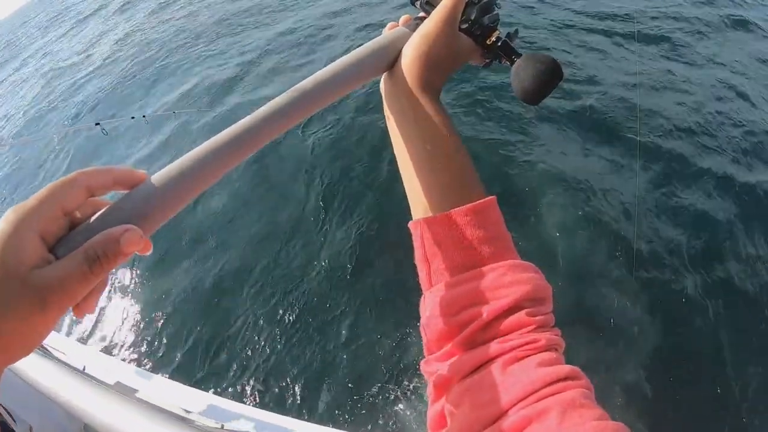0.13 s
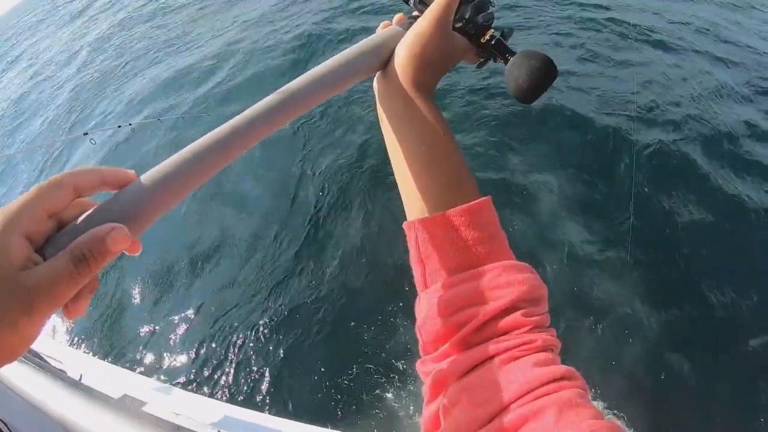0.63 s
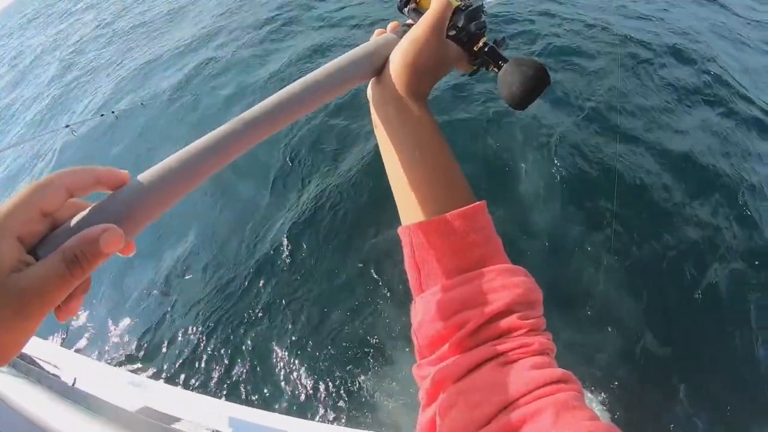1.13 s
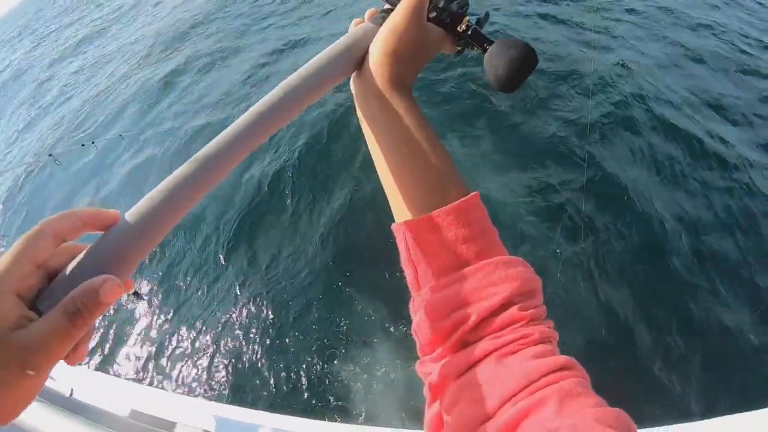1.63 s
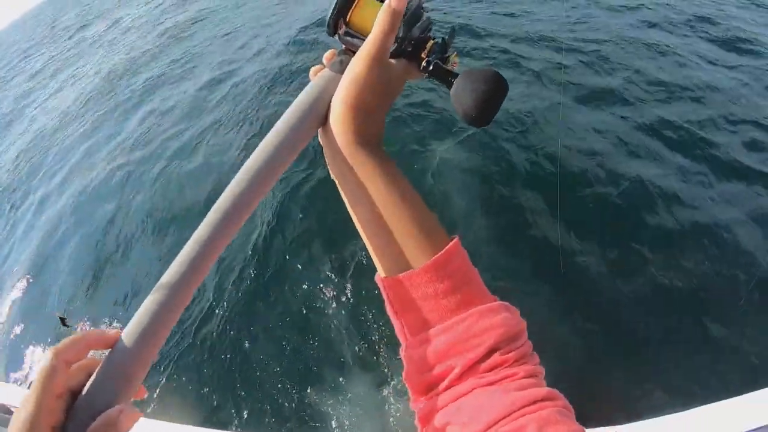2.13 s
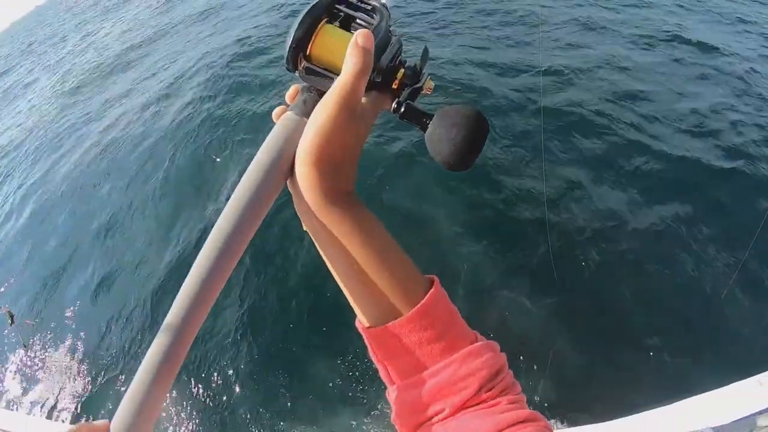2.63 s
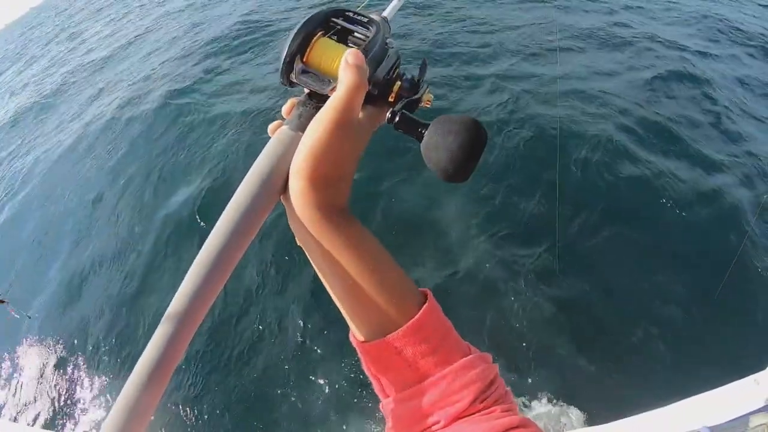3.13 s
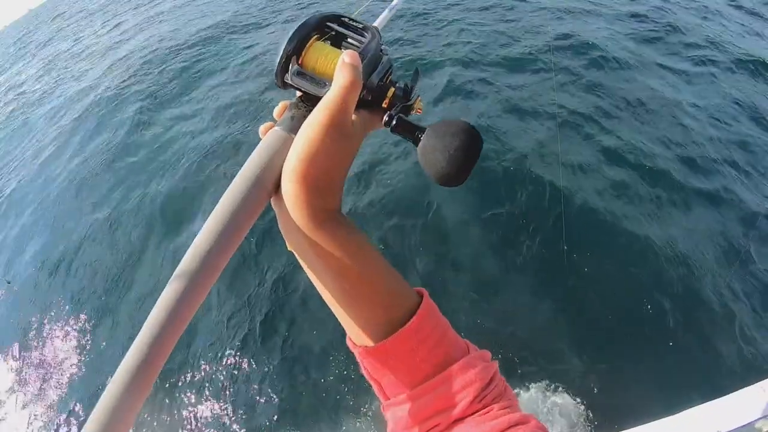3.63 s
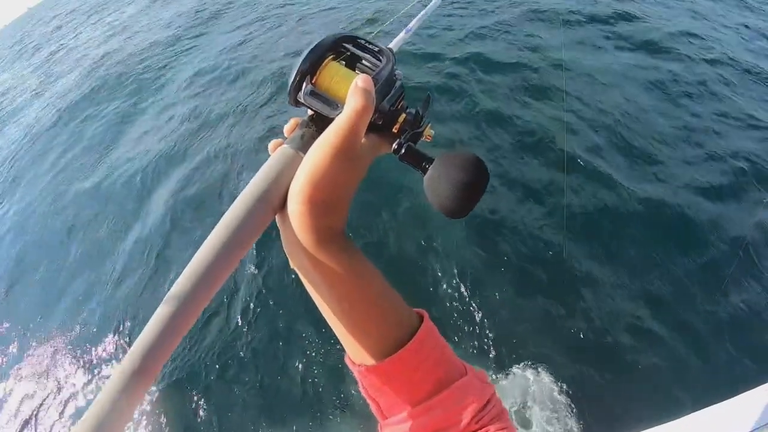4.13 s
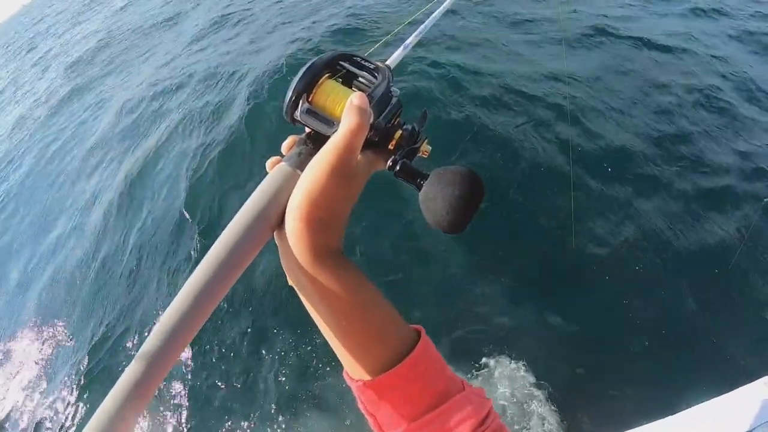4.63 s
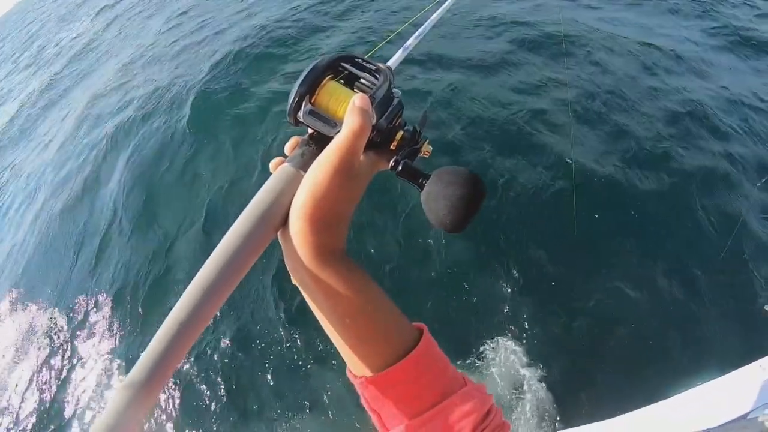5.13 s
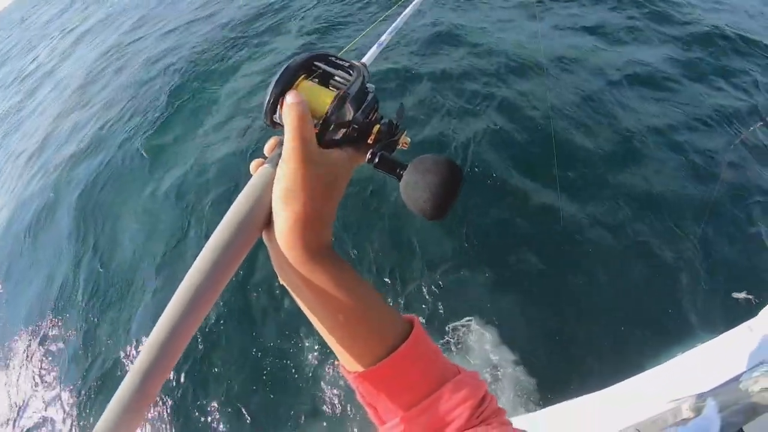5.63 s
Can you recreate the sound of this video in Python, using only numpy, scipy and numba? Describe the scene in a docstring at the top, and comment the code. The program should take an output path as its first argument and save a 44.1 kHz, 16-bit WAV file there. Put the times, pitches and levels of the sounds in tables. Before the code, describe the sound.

An idling fishing boat on open water, heard for just under six seconds by a small stereo camera near the rail. Throughout, a low diesel drone blends with a wavering generator hum and a steady pump hum around 170 Hz, beneath a dense, dull roar of exhaust and water with faint hiss. Soft low wind buffets appear near 0.3, 1.2, 2.8 and 3.6 seconds, and again around 4.8 to 5.3. Tiny dry ticks occur in the first 0.7 seconds and at 1.7, with a dull double tap near 0.5 and a faint rub at 1.65. At 3.1 a loud, bright, extremely short reel click snaps, with tiny aftersounds; the background above the bass dips and quickly recovers. A muffled tap follows at 4.6. Around 5.35 a rapid cluster of dull knocks and grainy thumb rubbing, slightly left, gives way to faint brushing as the stereo narrows.

```python
"""At the rail of an idling fishing boat, heard by a small camera with two microphone ports. Diesel, generator
and pump drone as wavering tones; exhaust and water are coloured noise. Gusts are short buffets of noise; soft,
grainy swells of noise are mostly a thumb brushing the spool. Reel clicks and dull taps are decaying tones; dry
ticks are tiny noise bursts. The camera's gain control ducks after the loud click, and the stereo image narrows
towards the end."""
import sys
import numpy as np
from scipy import signal
from scipy.fft import rfft, irfft, next_fast_len
from scipy.io import wavfile
from scipy.ndimage import map_coordinates
from numba import njit

SR = 44100
rng = np.random.default_rng(int(sys.argv[2]) if len(sys.argv) > 2 else 0)


def generate_wav(signal):
    """Clip the signal to [-1, 1] and save it as 16-bit WAV at the path in sys.argv[1]."""
    frames = np.transpose(np.atleast_2d(signal))
    scaled = np.clip(frames, -1, 1) * 32767
    pcm = np.round(scaled).astype(np.int16)
    wavfile.write(sys.argv[1], SR, pcm)


def natural_amplitude(level_db):
    """Convert a level in decibels to a linear amplitude factor, elementwise."""
    exponent = np.asarray(level_db, float) / 20
    return 10 ** exponent


N = 253999
T = np.arange(N) / SR  # time of each sample [s]
SIZE = next_fast_len(N)
HZ = np.maximum(np.fft.rfftfreq(SIZE, 1 / SR), 1)  # frequency of each spectrum line [Hz]


def level(x, db):
    """Scale a sound to an rms level in dB."""
    return x * natural_amplitude(db) / np.sqrt(np.mean(x ** 2))


def curve(table):
    """Join (time, value) rows by straight lines."""
    return np.interp(T, *np.transpose(table))


def shape(table):
    """Join (frequency, value) rows by straight lines on a log-frequency axis."""
    hz, value = np.transpose(table)
    return np.interp(np.log(HZ), np.log(hz), value)


def walk(rate):
    """A smooth random wander with `rate` new values a second and a spread near 1."""
    values = rng.standard_normal(int(T[-1] * rate) + 2)
    return map_coordinates(values, [T * rate], order=2)


def noise(gain):
    """Random noise coloured by a gain at each frequency."""
    return irfft(rfft(rng.standard_normal(SIZE)) * gain, SIZE)[:N]


def pan(x, db):
    """Make the left side louder than the right by db."""
    return x * natural_amplitude(np.array([[db], [-db]]) / 2)


def left_right(mid, side):
    """Turn a common part and a difference part into left and right."""
    return np.array([mid + side, mid - side])


def add(out, start_s, x):
    """Mix a short sound in at a time."""
    i = int(start_s * SR)
    out[:, i:i + x.shape[1]] += x[:, :N - i]


def ring(hz, t60, lag, rise):
    """A struck part rings: a tone that starts after a lag, swells in and falls 60 dB in t60 seconds."""
    t = np.maximum(T[:SR // 4] - lag, 0)
    decay = np.exp(-np.log(1000) * t / t60)
    swell = np.sin(np.pi / 2 * np.minimum(t / rise, 1)) ** 2
    return np.sin(2 * np.pi * hz * t) * decay * swell


def machine(turn_hz, orders, drift, waver_db, waver_rate):
    """A turning machine hums at multiples of its drifting rate; each tone wavers alone, higher ones more."""
    angle = 2 * np.pi * np.cumsum(turn_hz * (1 + drift * walk(2.036))) / SR
    start = rng.uniform(0, 2 * np.pi, len(orders))
    lowest = orders[0][0]
    tones = 0
    for (multiple, db), phase in zip(orders, start):
        waver = waver_db * (multiple / lowest) ** 0.35 * walk(waver_rate)
        tones = tones + np.sqrt(2) * natural_amplitude(db + waver) * np.sin(multiple * angle + phase)
    return tones, angle


# Fine hiss of water, level of the part common to both ports: (time [s], level [dB])
SPRAY_LEVEL = [(0.0, -54), (1.28, -55), (1.67, -53.5), (1.89, -56), (3.3, -58), (4.3, -56), (5.02, -61),
               (5.76, -56)]


def spray():
    """Water hisses: noise lifted near the port resonance, mostly differing between the two sides."""
    resonance = 1 / (1 + ((HZ - 8200) / 900) ** 4)
    gain = resonance + 1.6 / (1 + (7000 / HZ) ** 8)
    mid, side = level(noise(gain), 0), level(noise(gain), 4)
    return natural_amplitude(curve(SPRAY_LEVEL) + 2.0 * walk(17)) * left_right(mid, side)


# Colour of the wind noise: (frequency [Hz], relative level per Hz [dB])
WIND_COLOUR = [(15, -21.5), (25, -5.5), (65, 0), (120, -5.5), (200, -9.5), (400, -15.5), (700, -38),
               (1200, -45), (3000, -69)]
# Gusts on the ports: (time of full strength [s], hold [s], strength [dB])
GUST_TIMES = [(0.0, 0.2, -41), (0.261, .3, -25.5), (1.164, 0.027, -28.5), (2.422, 0.22, -37.5),
              (2.847, 0.091, -23.5), (3.012, .52, -33.5), (3.627, 0.19, -31), (4.792, 0.045, -23),
              (4.95, .05, -28.5), (5.09, 0.2, -24.5), (5.327, 0.26, -33.5)]
BREEZE_DB, GUST_RISE_S, GUST_FALL_S = -40.5, 0.0062, 0.018


def wind():
    """Breeze and gusts rumble at the ports in short buffets, stronger in the difference of the two."""
    strength = natural_amplitude(BREEZE_DB + 2.8 * walk(2.9))
    for full_s, hold_s, db in GUST_TIMES:
        rise = np.clip((T - full_s) / GUST_RISE_S + 1, 0, 1)
        fall = np.exp(-np.maximum(T - full_s - hold_s, 0) / GUST_FALL_S)
        strength = strength + natural_amplitude(db) * rise * fall
    colour = natural_amplitude(shape(WIND_COLOUR))
    common = colour / np.sqrt(1 + (45 / HZ) ** 6)  # less deep bass in the common part
    mid = level(noise(common) * natural_amplitude(0.51 * walk(42)), -6)
    side = level(noise(colour) * natural_amplitude(0.51 * walk(42)), -1)
    return strength * natural_amplitude(2.4 * walk(22)) * left_right(mid, side)


# Faint dry ticks of the tackle; the first decay time of each sounds 6 dB below its strength:
# (time [s], strength [dB], decay [s], centre [Hz], left minus right [dB])
TACKLE_TICKS = [(0.026, -37, .003, 8300, 3), (0.295, -40, .002, 8000, 1), (0.345, -32, 0.0026, 9600, -11),
                (0.3492, -32.5, 0.0023, 9600, -11), (0.625, -28, .001, 12000, -2),
                (1.6835, -39, .002, 9000, 7), (1.704, -33.5, .002, 8950, -7), (5.349, -31, .002, 6000, -3)]


def ticks():
    """Each tick is a burst of wide-band noise that dies away within milliseconds."""
    out, t = np.zeros((2, N)), T[:SR // 50]
    for start_s, db, decay_s, hz, pan_db in TACKLE_TICKS:
        burst = rng.standard_normal((3, len(t))) * np.exp(-t / decay_s)
        both = burst[0] + 0.6 * burst[1:]  # one shared noise plus one for each side
        edges = [hz / 1.6, min(hz * 1.6, 19000)]
        x = signal.sosfilt(signal.butter(2, edges, "bandpass", fs=SR, output="sos"), both)
        early_rms = np.sqrt(np.mean(x[:, :int(decay_s * SR) + 1] ** 2))
        add(out, start_s, pan(x * natural_amplitude(db) / early_rms / 2, pan_db))
    return out


# Soft grainy swells of noise, mostly thumb and sleeve rubbing; one leads into the loud click. Level before the
# swell: # (middle time [s], length [s], level [dB], centre [Hz], left minus right [dB])
GRAINY_SWELLS = [(1.652, 0.1, -53.5, 11400, -5), (3.092, 0.034, -46.5, 12000, -2),
                 (5.345, 0.013, -44, 4500, -8), (5.351, 0.037, -36.5, 1500, -7), (5.35, 0.029, -37, 1930, -6),
                 (5.352, 0.02, -41, 7000, -17), (5.377, 0.02, -43.5, 3200, 0), (5.414, 0.17, -53.5, 4470, 0),
                 (5.461, 0.04, -47.5, 9450, -6), (5.7, 0.38, -51, 12000, -2)]


def grainy_swells():
    """Grainy noise in soft swells, mostly skin on a surface, partly shared by the two sides."""
    out = 0
    for middle_s, length_s, db, hz, pan_db in GRAINY_SWELLS:
        gain = 1 / (1 + (np.log2(HZ / hz) / 1.3) ** 4)
        both = np.array([noise(gain), noise(gain)]) + 0.84 * noise(gain)
        grain = level(both, db) * natural_amplitude(3.0 * walk(155))
        swell = np.exp(-(2 * (T - middle_s) / length_s) ** 2)
        out = out + pan(grain * swell, pan_db)
    return out


# Dull taps: (time [s], frequency [Hz], level of the first tone [dB], 60 dB decay [s], left minus right [dB])
DULL_TAPS = [(0.476, 1200, -23, .12, 2.5), (0.497, 1150, -25, .08, 2.5), (4.58, 620, -25, .07, 0),
             (5.335, 1780, -23, .03, -6), (5.341, 2050, -21, .035, -6), (5.352, 1500, -26, .04, -5),
             (5.359, 1300, -24, .045, -5), (5.365, 1120, -26, .04, -4), (5.415, 1000, -27, .03, 0)]


def taps():
    """Each dull tap rings a close pair of tones, the upper one weaker and shorter."""
    out = np.zeros((2, N))
    for start_s, hz, db, t60, pan_db in DULL_TAPS:
        pair = ring(hz, t60, 0, 0.003) + 0.7 * ring(1.07 * hz, 0.46 * t60, 0, 0.002)
        add(out, start_s, pan(natural_amplitude(db) * pair, pan_db))
    return out


# Reel clicks: (time [s], peak before panning [dB], brightness [dB per octave], left minus right [dB])
REEL_CLICKS = [(3.1043, 3.8, -0.5, 1), (3.1071, -15, -6, 1), (3.1134, -14.5, -1.5, -5)]
# Ringing tones of the reel:
# (frequency [Hz], relative level [dB], 60 dB decay [s], left minus right [dB], sign [+1 or -1])
REEL_MODES = [(1850, -13, .008, 0, 1), (2600, -3.5, 0.011, 1, 1), (3300, -3.5, 0.011, 2, 1),
              (4050, -9, .011, 2, 1), (4700, -6, 0.008, 4.5, -1), (5060, 2.5, 0.0064, 5, 1),
              (6400, -18, .005, 0, 1), (7400, -3.5, 0.007, -5, -1), (8020, 2, .007, -5, 1),
              (10100, -14, .006, -5, 1), (11050, 3, 0.006, -7, -1), (11800, -10, .005, -3, 1),
              (12800, 1, .007, -2, 1)]
PORT_LAG_S = 0.00002  # the reel's sound reaches the left port later
CONTACT_S, CONTACT_S_PER_KHZ = 0.0002, 0.00014  # a click's push builds up longer for the high tones


def reel():
    """Each click sets the reel's tones ringing, with a faint noisy rattle after."""
    out = np.zeros((2, N))
    for start_s, peak_db, bright_db, pan_db in REEL_CLICKS:
        ports = []
        for lag, side in ((PORT_LAG_S, 1), (0, -1)):  # left, right
            port = 0
            for hz, db, t60, lean_db, sign in REEL_MODES:
                gain = sign * natural_amplitude(db + bright_db * np.log2(hz / 8000) + side * lean_db / 2)
                port = port + gain * ring(hz, t60, lag, CONTACT_S + CONTACT_S_PER_KHZ * hz / 1000)
            ports.append(port)
        x = np.array(ports)
        length = x.shape[1]
        tail = rng.standard_normal((2, length)) * np.exp(-T[:length] / 0.013)
        rattle = signal.fftconvolve(x[:, :300], tail, axes=1)[:, :length]
        x = x + natural_amplitude(-44.0) * rattle
        add(out, start_s, pan(x * natural_amplitude(peak_db) / np.abs(x).max(), pan_db))
    return out


# Roar of exhaust and water, common to both ports: (frequency [Hz], relative level per Hz [dB])
ROAR_COLOUR = [(15, -38.5), (25, -0.5), (55, 0), (150, -2.5), (165, -1.5), (185, -11.5), (225, -11.5),
               (350, -11.5), (425, -17.5), (492, -15), (822, -21), (907, -18), (976, -20), (1510, -20.5),
               (2530, -28), (3400, -34), (4500, -41.5), (7060, -50.5), (8580, -54), (11200, -79.5),
               (18900, -120)]
# The same for the part that differs between the ports: (frequency [Hz], relative level per Hz [dB])
SPREAD_COLOUR = [(30, -13.5), (150, -27), (300, -30.5), (550, -6.5), (1080, -4.5), (2000, -11),
                 (3650, -25.5), (8580, -25.5), (11200, -59), (15000, -85)]
# Hull resonances: (frequency [Hz], width [Hz], lift [dB])
HULL_MODES = [(265.3, 18, 5.5), (312, 20, 4.5), (480, 12, 3), (496, 7, 9), (608, 28, 5.5), (764, 26, 6.5),
              (905.6, 27, 7.5), (1100, 32, 7), (1210, 81, 2.5), (1500, 57, 4.5), (2680, 350, 1)]
# Lean to the left: (frequency [Hz], share of the common part added left and taken right)
LEFT_LEAN = [(300, 0.058), (900, .12), (1600, 0.026), (2700, 0.48), (4700, .15), (8100, .05)]
# Lead of the left port: (frequency [Hz], share added left and taken right a quarter cycle ahead)
LEFT_LEAD = [(60, .02), (170, 0), (300, .06), (600, .06), (1100, -.06), (2200, .05), (3200, .2),
             (5000, .35), (8000, .2)]
# Extra level of the roar between about 1 and 3 kHz: (time [s], level [dB])
MIDDLE_LEVEL = [(0, 0.5), (.5, 1.5), (.8, 1), (2, 1.3), (2.7, 1), (3.0, .5), (3.8, 0), (4.4, 1.5),
                (4.58, 1.6), (4.75, 0.5), (5.1, -0.5), (5.35, -1), (5.5, -1.5), (5.76, 0)]
ROAR_DB, SPREAD_DB = -22.5, -34.5  # rms before the lean and the flicker


def roar(angle):
    """Exhaust and water roar through hull resonances, throbbing with the firings; octaves flicker alone."""
    hull = natural_amplitude(sum(db / (1 + (2 * (HZ - hz) / width) ** 2) for hz, width, db in HULL_MODES))
    mid = rfft(level(noise(natural_amplitude(shape(ROAR_COLOUR)) * hull), ROAR_DB), SIZE)
    side = rfft(level(noise(natural_amplitude(shape(SPREAD_COLOUR)) * hull), SPREAD_DB), SIZE)
    side = side + (shape(LEFT_LEAN) + 1j * shape(LEFT_LEAD)) * mid
    both = left_right(mid, side)
    surge_db = 0.55 * walk(9) + 0.35 * np.cos(3 * angle)  # three throbs per shaft turn
    out = 0
    for octave in range(11):  # counted from 20 Hz
        band = np.cos(np.pi / 2 * np.clip(np.log2(HZ / 20) - octave, -1, 1)) ** 2
        flicker_db = surge_db + 0.48 * walk(9.1)
        if octave in (6, 7):
            flicker_db = flicker_db + curve(MIDDLE_LEVEL)
        out = out + natural_amplitude(flicker_db) * irfft(both * band, SIZE)[:, :N]
    return out


# Tones of the pump: (multiple of the turning rate, rms level [dB])
PUMP_TONES = [(1, -24.5), (3, -46), (6, -46.5)]
# Its second multiple: (time [s], rms level [dB])
PUMP_SECOND_LEVEL = [(0, -38), (.7, -33.5), (1.0, -37.5), (1.5, -34), (2.7, -38), (4.2, -35.5),
                     (5.0, -35.5), (5.5, -31.5), (5.76, -33.5)]
PUMP_HZ = 174.2


def pump():
    """The pump hums at multiples of its rate, slightly to the right; its second tone swells and fades."""
    steady, angle = machine(PUMP_HZ, PUMP_TONES, 0.00041, 0.57, 7.0)
    second = np.sqrt(2) * natural_amplitude(curve(PUMP_SECOND_LEVEL) + 1.5 * walk(6)) * np.sin(2 * angle)
    return pan(steady + second, -1.6)


# Weak tones of the generator: (multiple of the turning rate, rms level [dB])
GENERATOR_TONES = [(3, -36), (5, -47), (6, -48)]
# Its two strong tones: (time [s], rms level of the 2nd multiple [dB], rms level of the 4th [dB])
GENERATOR_HUM = [(0.0, -32, -23.5), (0.62, -26, -35), (1.11, -23, -29.5), (1.8, -30, -23.5),
                 (2.42, -29, -25), (2.9, -48, -27.5), (3.29, -43.5, -25.5), (3.51, -29, -27.5),
                 (3.95, -47.5, -29.5), (4.43, -26.5, -24.5), (5.0, -33, -28.5), (5.25, -29, -25),
                 (5.76, -27.5, -41)]
GENERATOR_HZ = 30.23


def generator():
    """The generator's rate drifts: weak tones waver while two strong ones swell and fade."""
    weak, angle = machine(GENERATOR_HZ, GENERATOR_TONES, 0.0051, 0.96, 3.1)
    times, second_db, fourth_db = np.transpose(GENERATOR_HUM)
    strong = 0
    for multiple, db in ((2, second_db), (4, fourth_db)):
        strong = strong + natural_amplitude(np.interp(T, times, db) + 1.2 * walk(5)) * np.sin(multiple * angle)
    return weak + np.sqrt(2) * strong


# Tones of the main diesel: (multiple of the turning rate, rms level [dB])
DIESEL_TONES = [(4, -31), (5, -52), (6, -35.5), (7, -33), (8, -53), (9, -32), (10, -53.5), (12, -27.5),
                (14, -57), (16, -45), (17, -54), (18, -38), (20, -40.5), (21, -43.5), (22, -45.5),
                (23, -48.5), (24, -43), (25, -40.5), (26, -50.5), (28, -41.5), (29, -55.5), (33, -56)]
SHAFT_HZ = 11.265


def diesel():
    """The idling diesel drones at multiples of its shaft rate; also returns the shaft angle."""
    return machine(SHAFT_HZ, DIESEL_TONES, 0.0011, 1.18, 2.976)


def scene():
    """Mix all the sources; the machines reach the right port a touch later than the left."""
    engine, angle = diesel()
    left, right = engine + generator() + pump()
    lag = 2  # samples
    machines = np.array([left, np.pad(right, (lag, 0), "edge")[:N]])
    return machines + roar(angle) + spray() + wind() + reel() + taps() + ticks() + grainy_swells()


# Response of the microphones: (frequency [Hz], gain [dB])
MICROPHONE_GAIN = [(20, -7.5), (32, -5), (42, -0.5), (8600, 0.5), (9100, -3.5), (12500, -16.5),
                   (14400, -22.5), (15500, -40.5)]


def microphone(dry):
    """The microphones weaken the deepest bass and the high treble; returns the spectrum."""
    return rfft(dry, SIZE) * natural_amplitude(shape(MICROPHONE_GAIN))


@njit
def follow(x, attack, release):
    """Follow the peaks of a sound, rising at one speed and falling at another."""
    e, y = 0., np.empty(len(x))
    for i in range(len(x)):
        e += (x[i] - e) * (attack if x[i] > e else release)
        y[i] = e
    return y


def gain_control(spectrum):
    """Loud sounds turn down the band above the bass, less so the treble; the bass is left alone."""
    low, high = 1 / (1 + (HZ / 300) ** 6), 1 / (1 + (4200 / HZ) ** 4)
    bass, body, treble = (irfft(spectrum * g, SIZE)[:, :N] for g in (low, 1 - low - high, high))
    attack_s, release_s, threshold_db = 0.002, 0.058, -28.5
    heard = np.abs(0.089 * body + treble).max(0)  # the detector favours treble
    peaks = follow(heard, 1 / (attack_s * SR), 1 / (release_s * SR))
    gain = np.minimum(natural_amplitude(threshold_db) / (peaks + 1e-9), 1)
    return bass, body * gain + treble * gain ** 0.38


# Narrowing of the image: (time [s], share of stereo width kept)
STEREO_WIDTH = [(0, 1), (5.3, 0.89), (5.5, 0.42), (5.76, .15)]


def narrow(x):
    """Shrink the difference between left and right as time goes on."""
    mid, side = (x[0] + x[1]) / 2, (x[0] - x[1]) / 2
    return left_right(mid, side * curve(STEREO_WIDTH))


def roll_off(x):
    """The treble ends steeply here."""
    return signal.sosfilt(signal.butter(12, 15100, fs=SR, output="sos"), x)


def record(dry):
    """The camera hears the scene, controls its gain and narrows the image above the bass."""
    bass, upper = gain_control(microphone(dry))
    mix = bass + narrow(upper)
    return roll_off(mix)


dry = scene()
out = record(dry)
generate_wav(out)
```